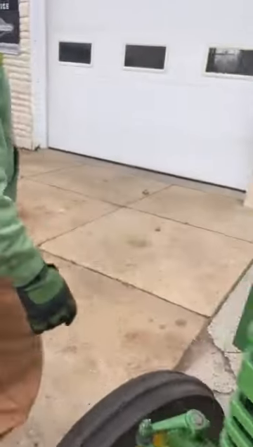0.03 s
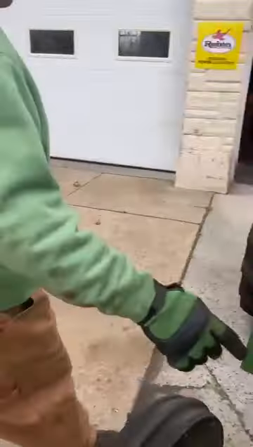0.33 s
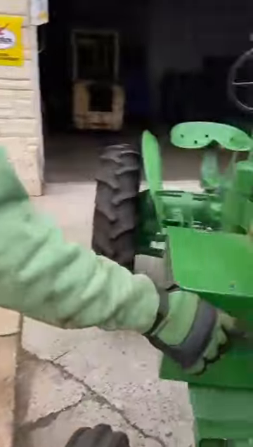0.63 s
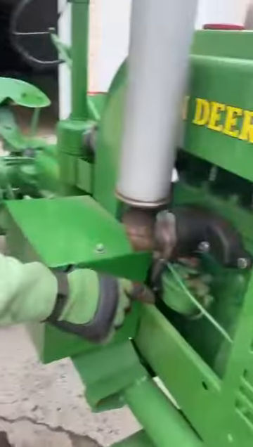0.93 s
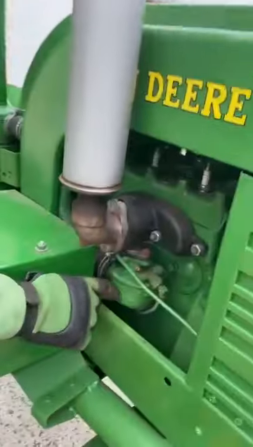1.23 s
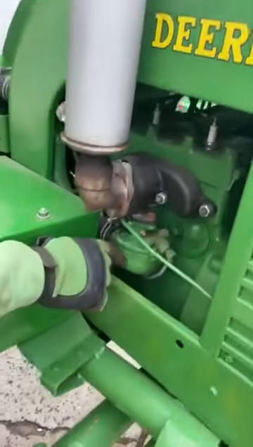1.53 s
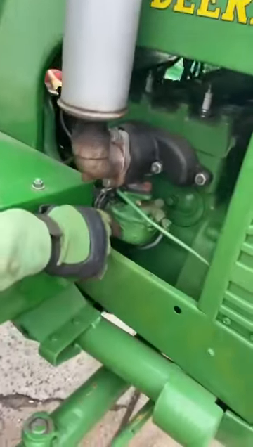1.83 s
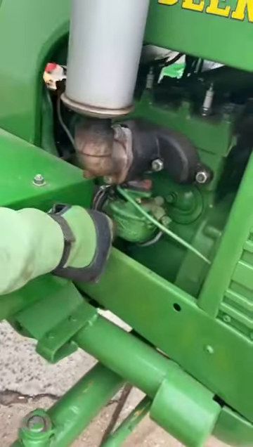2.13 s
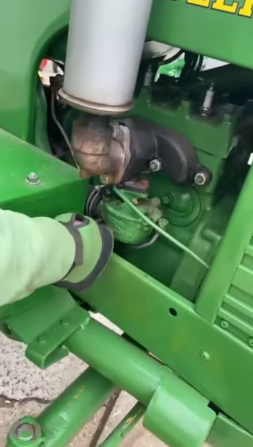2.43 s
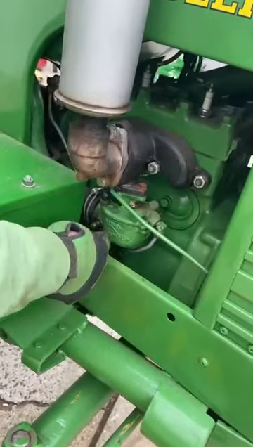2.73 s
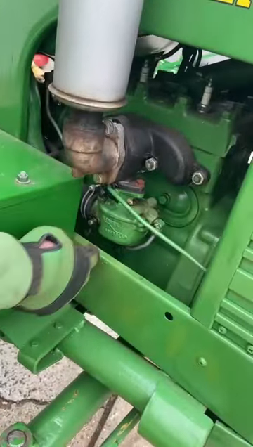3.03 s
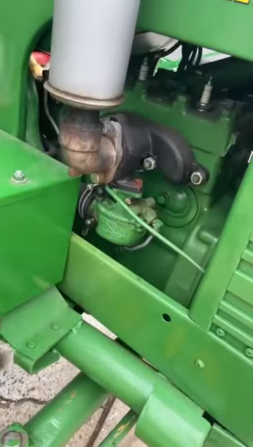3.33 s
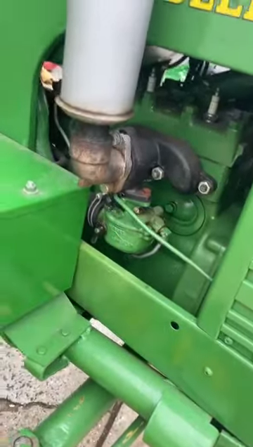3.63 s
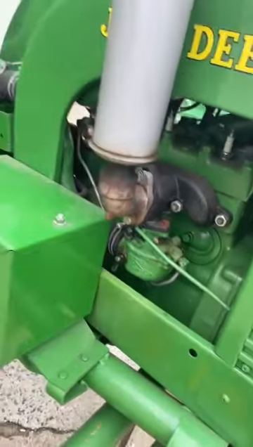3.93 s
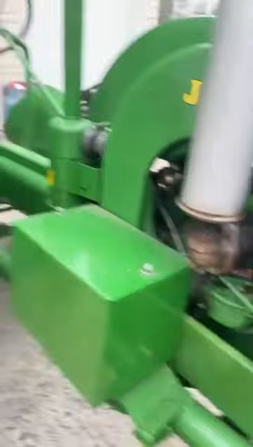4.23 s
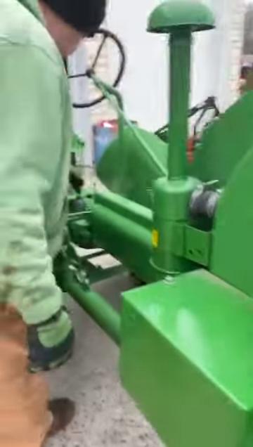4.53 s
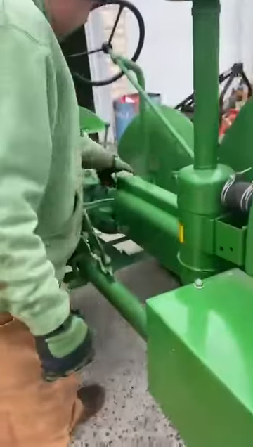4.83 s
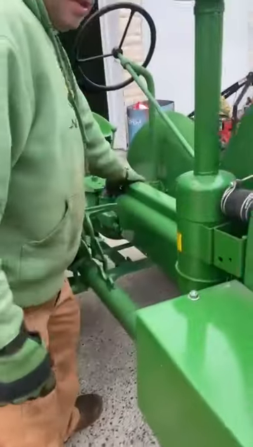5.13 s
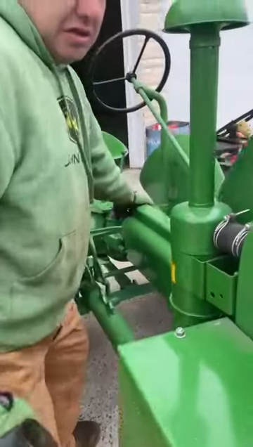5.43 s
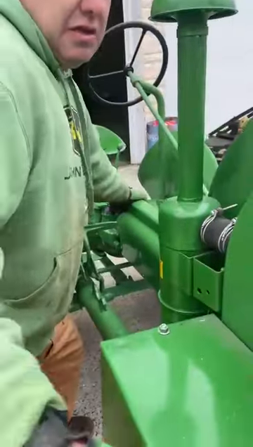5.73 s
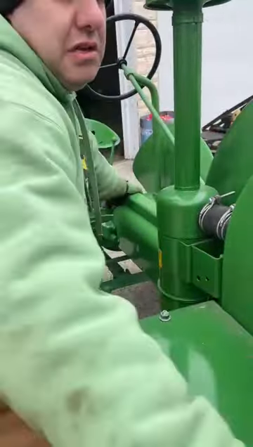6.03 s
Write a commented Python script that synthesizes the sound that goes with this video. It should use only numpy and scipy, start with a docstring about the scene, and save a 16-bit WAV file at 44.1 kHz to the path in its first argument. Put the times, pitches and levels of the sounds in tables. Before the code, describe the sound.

Gusts, rustling clothes and light taps outdoors, followed by ringing clanks of tractor levers and a short, harsh starter grind.

```python
"""An old tractor is made ready and started in a yard beside a garage, which gives a faint echo.
Over a quiet hush, clothes rustle and gusts of wind buffet the microphone, on and off throughout.
A gloved hand taps and rubs the controls at the carburettor and pulls the squeaky choke rod.
From 4 s the gear lever clanks twice, then the clutch lever clanks. At 6 s the starter's small gear
(the pinion) crashes into the toothed ring on the flywheel and grinds the engine round."""
import sys
import numpy as np
from scipy import signal
from scipy.fft import rfft, irfft, next_fast_len
from scipy.io import wavfile
from scipy.ndimage import uniform_filter1d

SR = 44100
rng = np.random.default_rng(int(sys.argv[2]) if len(sys.argv) > 2 else 0)


def bounce(signal):
    """Save signal as a 16-bit WAV file at the path given by the first command-line argument."""
    frames = np.transpose(np.atleast_2d(signal))
    limited = np.clip(frames, -1, 1)
    pcm = np.round(limited * 32767).astype(np.int16)
    wavfile.write(sys.argv[1], SR, pcm)


N = 277389
TIME = np.arange(N) / SR


def amp(db):
    """Turns decibels into a gain."""
    return 10 ** (np.asarray(db) / 20)


def unit(x):
    """Scales a signal to an average power of 1."""
    return x / np.sqrt(np.mean(x ** 2) + 1e-20)


def read(points, hz):
    """Looks up a table between its rows, on a log-frequency axis."""
    f, value = np.transpose(points)
    return np.interp(np.log(hz + 1), np.log(f + 1), value)


def octaves(hz):
    """Octaves above 2000 Hz. Times a tilt in dB per octave, this brightens or dulls a sound."""
    return np.log2(np.maximum(hz, 200) / 2000)


def bump(hz, centre, peak_db, width):
    """One resonance in dB, its width in octaves."""
    return peak_db * np.exp(-(np.log2((hz + 1) / centre) / width) ** 2)


def swell(t, rise, hold, fall, sag_db=0):
    """Rises, holds, then drops 20 dB per fall time; after the rise it also sags by sag_db a second."""
    fade_db = -sag_db * np.maximum(t - rise, 0) - 20 * np.maximum(t - rise - hold, 0) / fall
    return np.clip(t / rise, 0, 1) * amp(fade_db)


def add(mix, s, sound):
    """Mixes a sound in at s seconds."""
    part = mix[max(round(s * SR), 0):][:len(sound)]
    part += sound[:len(part)]


def colour(x, db_at):
    """Filters x by a function of frequency, in dB."""
    size = next_fast_len(len(x) + 2048)
    return irfft(rfft(x, size) * amp(db_at(np.fft.rfftfreq(size, 1 / SR))), size)[:len(x)]


def sweep(x, db_at, size=256):
    """Filters x by a function of frequency and time, in dB."""
    frames = dict(fs=SR, nperseg=size, noverlap=size * 3 // 4)
    hz, t, spectra = signal.stft(x, **frames)
    return signal.istft(spectra * amp(db_at(hz[:, None], t)), **frames)[1][:len(x)]


def grit(count, spread_db):
    """Noise made of tiny contacts of uneven size."""
    noise = rng.standard_normal(count)
    sizes = np.repeat(rng.standard_normal(count // 32 + 1), 32)[:count]
    return unit(noise * amp(spread_db * sizes))


def ripple(hz, spacing_hz=64.66, depth_db=3.0):
    """Random peaks and dips in dB, as the many overlapping resonances of cast metal give."""
    heights = depth_db * rng.standard_normal(2000)
    return np.interp(hz / spacing_hz, np.arange(len(heights)), heights) * np.minimum(hz / 2000, 1)


def struck(blows, spectrum, decays, notes):
    """Struck metal: a noisy cloud of resonances and a few clear notes. A decay is a 60 dB fade."""
    out, t = np.zeros(N), np.arange(SR * 2 // 3) / SR
    for s, db, rise, stretch, tilt, ring_db in blows:  # stretch multiplies every decay time
        tone = lambda hz: read(spectrum, hz) + tilt * octaves(hz) + ripple(hz)
        fade = lambda hz, age: -60 * np.maximum(age - rise, 0) / (stretch * read(decays, hz))
        cloud = sweep(unit(colour(rng.standard_normal(len(t)), tone)), fade)
        ring = sum(amp(level - 60 * t / (decay * stretch)) * np.sin(2 * np.pi * (hz * t + rng.random()))
                   for hz, level, decay in notes)
        add(out, s, amp(db) * np.minimum(t / rise, 1) * (cloud + amp(ring_db) * ring))
    return out


def yard_hush(level_db=-49):
    """The distant outdoors: steady, low noise."""
    # tone of the hush: f/Hz, level/dB
    spectrum = [(59, -30), (100, 3), (125, -4.5), (165, -8.5), (246, -11.5), (398, -21), (712, -20),
                (1350, -26.5), (1940, -31), (10400, -43), (12000, -50), (15600, -84), (22000, -120)]
    return amp(level_db) * unit(colour(rng.standard_normal(N), lambda hz: read(spectrum, hz)))


def clothes(gain_db=-2):
    """Cloth rustles as the person steps up, reaches in, lets go, turns and leans over."""
    # tone of the cloth: f/Hz, level/dB
    spectrum = [(150, -5.5), (400, 3.5), (900, -2.5), (1600, -2.5), (3000, -7.5), (6000, -11), (9000, -14),
                (12000, -22)]
    # body movements: t/s, rise/s, hold/s, fall/s, level/dB
    moves = [(-.1, 0.24, 0.23, 1.7, -49), (0.84, 0.26, 0.14, 0.82, -46.5), (3.206, 0.29, 0.11, 0.45, -56.5),
             (4.547, 0.13, 0.043, 0.95, -53), (5.202, 1, 0.29, 0.42, -45.5)]
    rustle = sweep(grit(N, spread_db=2.0), lambda hz, t: read(spectrum, hz))
    swells = [amp(db) * swell(TIME - s, rise, hold, fall) for s, rise, hold, fall, db in moves]
    return amp(gain_db) * np.linalg.norm(swells, axis=0) * unit(rustle)


def wind(breeze_db=-46.5, flutter_db=2.5, flutter_hz=14.8, strong_db=-19, reach=0.016, steadiness=0.34):
    """Air swirls at the microphone; a stronger gust makes smaller swirls, so the rumble reaches higher."""
    # gusts, plus a brief bass thump at 1.116 s: t/s, length/s, level/dB
    gusts = [(0.274, 0.047, -32.5), (0.406, 0.21, -22.5), (0.622, .18, -16), (0.836, .14, -14.5),
             (1.116, 0.025, -24), (1.29, .08, -31.5), (1.645, 0.16, -35.5), (1.946, 0.035, -38.5),
             (2.736, 0.19, -34), (2.965, .21, -32.5), (4.152, .035, -32.5), (4.383, 0.031, -25.5),
             (4.598, 0.18, -26), (4.918, 0.18, -23), (5.375, 0.16, -26.5), (5.56, 0.061, -23)]
    # tone of the rumble in a strong gust: f/Hz, level/dB
    spectrum = [(20, -40), (40, -14.5), (66, 3.5), (110, -3.5), (170, -10.5), (300, -25), (500, -40.5),
                (900, -58.5), (2000, -74.5)]
    rise = 0.024
    swells = [amp(db) * swell(TIME - s, rise, length - rise, fall=0.08, sag_db=17.5)
              for s, length, db in gusts]
    flutter = unit(colour(rng.standard_normal(N), lambda hz: -20 * (hz / flutter_hz - 1) ** 2))
    force_db = 10 * np.log10(amp(breeze_db) ** 2 + np.square(swells).sum(0)) + flutter_db * flutter
    pitch = lambda t: np.exp(reach * (np.interp(t, TIME, force_db) - strong_db))
    swirls = sweep(rng.standard_normal(N), lambda hz, t: read(spectrum, hz / pitch(t)), size=2048)
    lumps = np.sqrt(uniform_filter1d(abs(signal.hilbert(swirls)) ** 2, size=1300))
    return unit(swirls / lumps ** steadiness) * amp(force_db)  # partly evens out the noise's own lumps


def linkage_clicks(rise_s=0.0013, ring_db=-8):
    """The rods that link the controls click lightly."""
    # clicks: t/s, level/dB, stretch, tilt/dB per octave
    clicks = [(.29, -45.5, 1.1, -4), (2.276, -53.5, 1.2, 3), (2.384, -51, 0.53, 3), (2.502, -44, 0.25, 7.5),
              (3.397, -51, 1.8, -3), (3.656, -54.5, 0.65, 1), (4.186, -41.5, 1.1, -0.5),
              (4.21, -46.5, 1.3, 1), (4.238, -40.5, 1.8, -7.5), (4.323, -41.5, 0.91, 5),
              (4.353, -42, 1.3, -0.5), (4.624, -44, 0.84, -2), (4.693, -33.5, 0.6, 9),
              (5.009, -49, 4.1, -2.5), (5.459, -51, 2.3, 0)]
    # tone of the rods: f/Hz, level/dB
    spectrum = [(300, -10), (1200, 9), (2500, 5.5), (4200, 5), (7000, -3.5), (10000, 0.5), (12000, -24)]
    # how long they ring: f/Hz, decay/s
    decays = [(500, 0.18), (8000, 0.043)]
    # their clear notes: f/Hz, level/dB, decay/s
    notes = [(4030, -7, 0.065), (4940, -9, 0.055)]
    blows = [(s, db, rise_s, stretch, tilt, ring_db) for s, db, stretch, tilt in clicks]
    return struck(blows, spectrum, decays, notes)


def panel_knocks():
    """The hand knocks against the tractor's side, which thuds."""
    # knocks: t/s, level/dB, rise/s, stretch, tilt/dB per octave, ring/dB
    blows = [(.324, -34, 0.00071, 1.24, -1.5, -7), (1.1, -33, .008, 1.04, -12, -2.5),
             (1.139, -24.5, 0.00039, 0.68, 1, -3), (1.165, -45, 0.0023, 1.1, 6, -6),
             (1.207, -32, 0.0082, 0.4, -2.5, -8)]
    # tone of the panel: f/Hz, level/dB
    spectrum = [(60, -11), (150, 4.5), (300, 4), (600, -5), (1050, -12), (2300, -13), (4000, -30),
                (10000, -41.5)]
    # how long it rings: f/Hz, decay/s
    decays = [(150, 0.23), (1000, 0.03), (8000, 0.11)]
    # its clear notes: f/Hz, level/dB, decay/s
    notes = [(243, 1.5, 0.08), (1012, 0.5, 0.043)]
    return struck(blows, spectrum, decays, notes)


def wind_slaps(hz=208, cycles=0.52):
    """The strongest swirls each slap the microphone with one brief swing of pressure."""
    # slaps: t/s, level/dB
    slaps = [(0.662, -13), (.699, -8.5), (0.784, -13), (0.868, -7.5), (.937, -14), (5.464, -16.5),
             (5.572, -16.5), (5.615, -24)]
    out, t = np.zeros(N), np.arange(-SR // 20, SR // 20) / SR
    for s, db in slaps:
        swing = np.cos(2 * np.pi * (hz * t + rng.random())) / np.cosh(2 * hz * t / cycles)
        add(out, s + t[0], amp(db) * swing)
    return out


def scrapes(peak_db=9.5):
    """A glove or sole slides: a swell of gritty noise through one resonance of the rubbed part."""
    # rubs: t/s, rise/s, hold/s, fall/s, level/dB, resonance/Hz, width/octaves, tilt/dB per octave
    rubs = [(.824, 0.0034, 0.032, .035, -30.5, 2250, 0.46, -3.5),
            (1.25, .15, 0.056, .15, -49, 1320, .55, -4.5), (2.26, 0.057, .05, 0.068, -60, 4520, 1, 1),
            (2.937, 0.048, .02, 0.16, -56.5, 1800, 0.79, 1), (3.392, .14, 0.089, .15, -54.5, 3800, 1, 0),
            (3.543, 0.017, 0.026, 0.034, -42.5, 3350, 0.59, 1.5),
            (3.808, .003, 0.0043, 0.08, -32, 1970, 0.81, -1.5),
            (3.844, 0.0068, 0.033, 0.065, -43, 3000, .8, 2), (4.777, 0.069, .01, 0.03, -48, 5100, 1, -3),
            (5.833, 0.05, .01, 0.14, -39.5, 3320, 1, -3)]
    # tone shared by all rubs: f/Hz, level/dB
    spectrum = [(100, 4), (400, -4), (1000, -5.5), (2000, -2), (4500, -6.5), (7000, -11), (12000, -17)]
    out, t = np.zeros(N), np.arange(SR) / SR
    for s, rise, hold, fall, db, centre, width, tilt in rubs:
        tone = lambda hz: read(spectrum, hz) + tilt * octaves(hz) + bump(hz, centre, peak_db, width)
        friction = unit(colour(grit(len(t), spread_db=2.5), tone))
        add(out, s, amp(db) * swell(t, rise, hold, fall) * friction)
    return out


def choke_rod(start_s=1.611, level_db=-37):
    """The rod drags through its guide, and the friction squeaks in its narrow resonances."""
    # tone of the rod: f/Hz, level/dB
    spectrum = [(100, 0), (600, 2.5), (2500, -4.5), (4500, -6.5), (7000, -13), (10500, -9), (12000, -25)]
    # its resonances: f/Hz, height/dB, width/octaves
    peaks = [(1040, 6.5, 0.056), (1570, 9.5, 0.15), (4350, 11.5, 0.044)]
    out, t = np.zeros(N), np.arange(SR // 2) / SR
    tone = lambda hz: read(spectrum, hz) + sum(bump(hz, *peak) for peak in peaks)
    squeak = unit(colour(grit(len(t), spread_db=3.0), tone))
    add(out, start_s, amp(level_db) * swell(t, rise=0.016, hold=0.042, fall=0.042) * squeak)
    return out


def gear_lever():
    """The lever hits one end stop, then the other; each makes the gearbox ring in its own way."""
    # blows: t/s, level/dB, rise/s, stretch, tilt/dB per octave, ring/dB
    blows = [(4.011, -18.5, 0.011, 1.09, 0.014, -5.5), (4.376, -16.5, 0.009, 1.084, 0.0047, -6)]
    # tone of the gearbox: f/Hz, level/dB
    spectrum = [(100, -1), (300, -2.5), (520, 2.5), (750, -5), (1500, 3), (2100, 2.5), (2800, 5.5),
                (3800, 4.5), (5300, -1.5), (7000, 2), (8800, -9.5), (10400, -4), (11400, -27)]
    # how long it rings: f/Hz, decay/s
    decays = [(300, 0.78), (1400, 0.3), (2800, 0.17), (5000, 0.12), (10000, 0.072)]
    # its clear notes: f/Hz, level at first stop/dB, level at second stop/dB, decay/s
    notes = [(494, 4.5, -12, 0.35), (554, 2, -8, 0.34), (1455, -13, -6, .33), (1503, -20, -10, 0.32),
             (1830, -2.5, -10, 0.21), (1890, -22, -11, 0.32), (2500, -16, -3.5, 0.21),
             (2665, -14, -17, 0.14), (3355, -6, -27, 0.13), (3610, -25, -6, 0.2), (3970, -5, -14, .12),
             (4580, 2, -10, .093), (6860, 2.5, 0, 0.086)]
    out = np.zeros(N)
    for stop, blow in enumerate(blows):
        stop_notes = [(hz, levels[stop], decay) for hz, *levels, decay in notes]
        out += struck([blow], spectrum, decays, stop_notes)
    return out


def clutch_lever():
    """The clutch lever and its catch clank together."""
    # clanks: t/s, level/dB, rise/s, stretch, tilt/dB per octave, ring/dB
    blows = [(5.238, -27.5, 0.0012, 1.6, -2, -26), (5.255, -23, 0.004, 1.15, 2.4, -3),
             (5.32, -29.5, 0.0044, 1.1, -3.5, -22), (5.618, -32.5, 0.0063, 1.5, -3.5, 1.5),
             (5.64, -15, 0.0067, 1.03, 0.5, -4), (5.717, -17, 0.00084, 1.21, 1.5, -17)]
    # tone of the lever: f/Hz, level/dB
    spectrum = [(100, -7), (300, 3.5), (600, 5), (1100, 5.5), (2000, 1), (2900, -6), (4000, 2), (6000, 0.5),
                (8000, 0.5), (10500, -2), (12000, -24)]
    # how long it rings: f/Hz, decay/s
    decays = [(300, 0.46), (1400, 0.21), (2800, 0.15), (5000, 0.092), (10000, 0.064)]
    # its clear notes: f/Hz, level/dB, decay/s
    notes = [(305, -3.5, 0.12), (558, 4, 0.092), (605, -4.5, 0.13), (987, -5, 0.19), (1055, -1.5, 0.19),
             (1740, -10, 0.27), (3930, -19, .09), (6970, -21, 0.04), (7360, -12, 0.16)]
    return struck(blows, spectrum, decays, notes)


def starter(touch_s=5.985, bite_s=6.029, bite_rise_s=0.022, tooth_hz=340, slip=0.2, turn_hz=19.15):
    """Gear teeth hit and scrape, hardest once each turn of the pinion; housing and flywheel ring."""
    # clashes as the starter engages: t/s, level/dB, rise/s, stretch, tilt/dB per octave, ring/dB
    clashes = [(5.998, -23.5, 0.0051, 0.28, 0.33, -22), (6.031, -20.5, 0.0075, 1, 1, -20),
               (6.043, -18, 0.0026, 0.61, 0.44, 7)]
    # tone of the housing: f/Hz, level/dB
    spectrum = [(60, -43), (130, -3), (215, -1.5), (600, -1.5), (1100, -1.5), (1600, 2), (1950, -1.5),
                (2200, -6.5), (4000, -11.5), (7500, -13.5), (10000, -23), (12000, -46)]
    # how long it rings: f/Hz, decay/s
    decays = [(300, 0.33), (2000, 0.036), (9000, 0.19)]
    # clear notes of the flywheel and its ring: f/Hz, level/dB, decay/s
    notes = [(313, -8, 0.054), (605, -3.5, 0.1), (702, -12.5, 0.15), (877, -12, 0.17), (927, -8, 0.12),
             (1144, -9, 0.13), (1353, 1, 0.15), (1425, -0.5, 0.14), (1750, -1.5, 0.13), (1788, -3, 0.31),
             (1910, -6.5, 0.19), (3290, -12, 0.062), (3380, -14, 0.2), (4092, -15, 0.089)]
    t = TIME[TIME > touch_s]
    wobble = unit(uniform_filter1d(rng.standard_normal(len(t)), size=200))
    teeth = np.cumsum(tooth_hz * (1 + slip * wobble)) / SR
    contact = unit(grit(len(t), spread_db=-0.5) * np.exp(-(teeth % 1)))  # one burst per tooth
    # the pinion touches, bites with a surge, then grinds on and sags under the load
    surge = swell(t - bite_s, bite_rise_s, hold=0.033, fall=0.096, sag_db=45)
    drive = np.minimum((t - touch_s) / 0.039, 1) * amp(-21.5 - 10.5 * (t - touch_s))
    throb = np.cos(2 * np.pi * turn_hz * (t - bite_s - bite_rise_s))
    force = np.hypot(drive, amp(-13) * surge) * amp(2.04 * throb)
    tilt = -2.07 + 2.67 * surge + 0.7 * throb  # dB per octave: the harder the teeth press, the brighter
    tone = lambda hz, age: read(spectrum, hz) + np.interp(age + t[0], t, tilt) * octaves(hz)
    grind = unit(sweep(contact, tone))
    ring = 0
    for hz, db, decay in notes:
        pole = np.exp((2j * np.pi * hz - np.log(1000) / decay) / SR)  # a filter that rings at one note
        ring += amp(db) * unit(signal.lfilter([1], [1, -pole], contact).real)
    out = np.zeros(N)
    add(out, t[0], force * (amp(-1) * grind + amp(-4.5) * unit(ring)))
    return out + struck(clashes, spectrum, decays, notes)


def echo(x, onset_s=0.0031, tilt_db=-3.5):
    """The garage front and the yard send back a dull tail of sound."""
    # how long the echo lasts: f/Hz, decay/s
    decays = [(200, 0.5), (1400, 0.96), (3500, 0.53), (10000, 0.67)]
    t = np.arange(SR) / SR
    reflections = rng.standard_normal(SR) * (1 - np.exp(-t / onset_s))
    tail = sweep(reflections, lambda hz, age: tilt_db * octaves(hz) - 60 * age / read(decays, hz))
    return signal.fftconvolve(x, tail / np.linalg.norm(tail))[:N]


def scene():
    """Tractor and hand in the yard, with wind at the microphone."""
    hand = linkage_clicks() + panel_knocks() + scrapes() + choke_rod()
    tractor = hand + gear_lever() + clutch_lever() + starter()
    return (tractor + amp(-20.5) * echo(tractor) + yard_hush() + clothes() + wind() + wind_slaps())[None]


def record(dry, low_cut_hz=38, ceiling=0.9, high_cut_hz=12000):
    """The microphone sheds the deepest bass, peaks are rounded off, then the top treble is cut."""
    heard = signal.sosfilt(signal.butter(2, low_cut_hz, "highpass", fs=SR, output="sos"), dry)
    limited = heard / (1 + (heard / ceiling) ** 6) ** (1 / 6)
    treble_cut = signal.firwin(255, high_cut_hz, window=("kaiser", 8), fs=SR)
    return signal.oaconvolve(limited, treble_cut[None], "same")


dry = scene()
out = record(dry)
bounce(out)
```